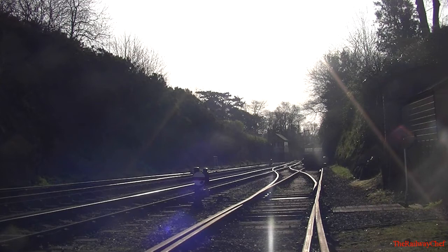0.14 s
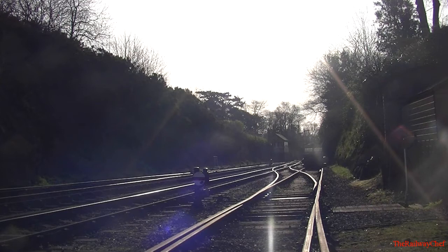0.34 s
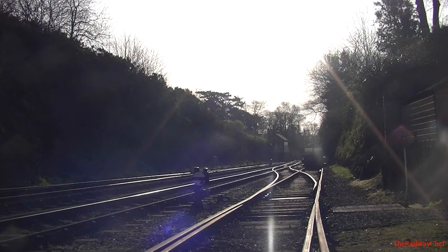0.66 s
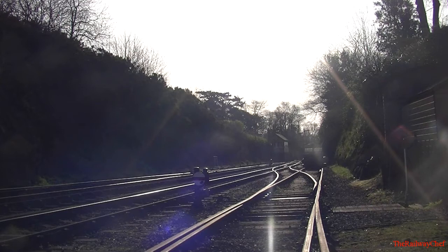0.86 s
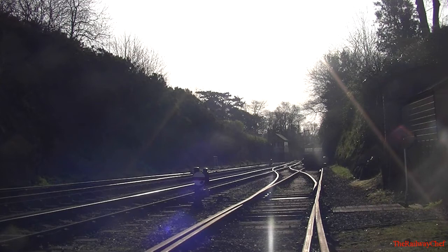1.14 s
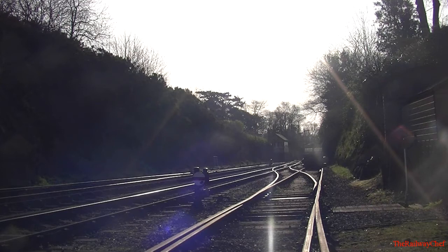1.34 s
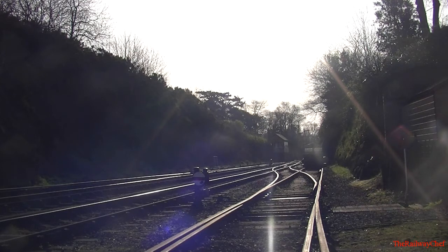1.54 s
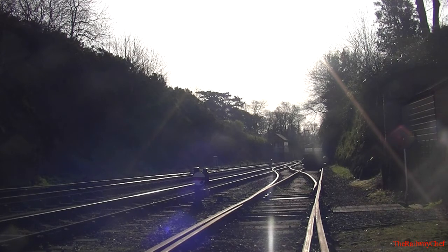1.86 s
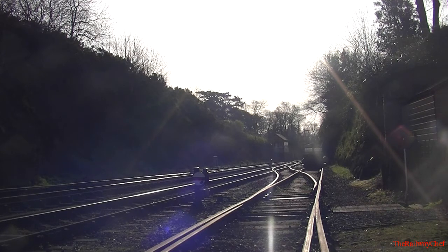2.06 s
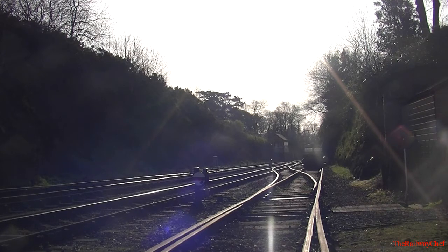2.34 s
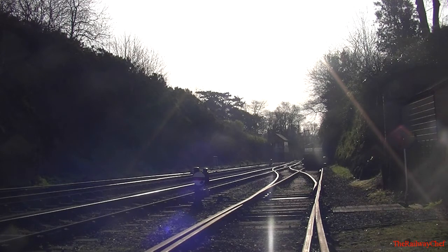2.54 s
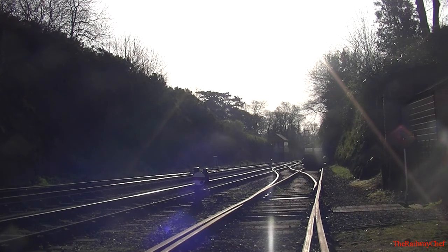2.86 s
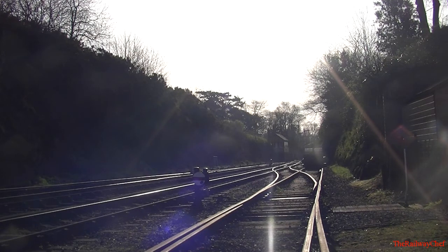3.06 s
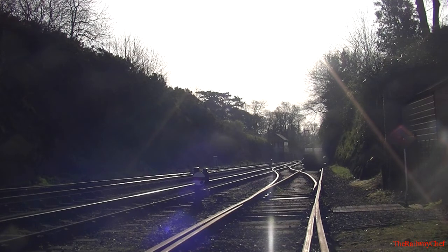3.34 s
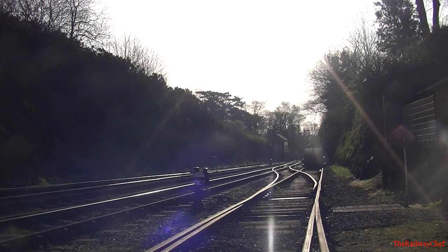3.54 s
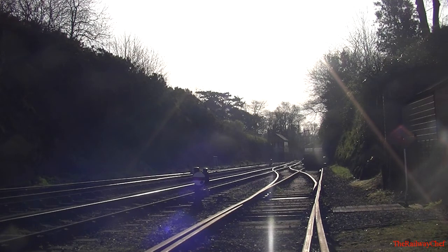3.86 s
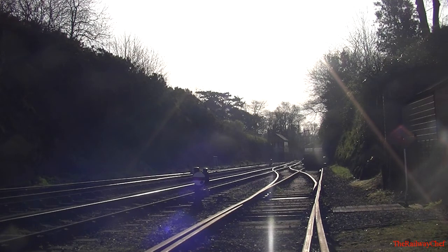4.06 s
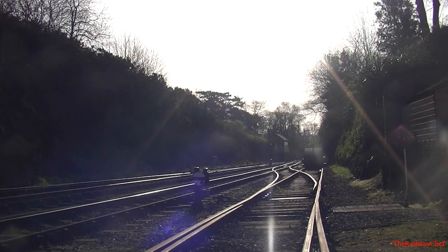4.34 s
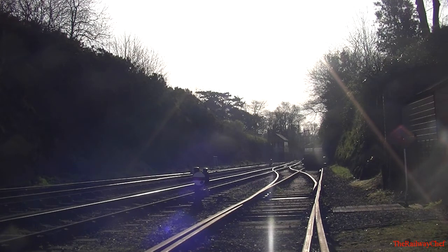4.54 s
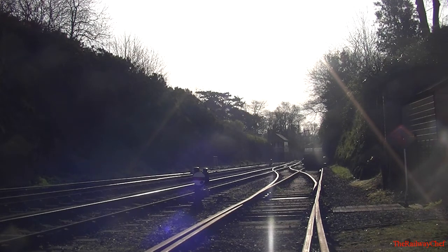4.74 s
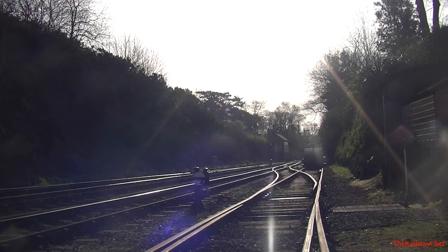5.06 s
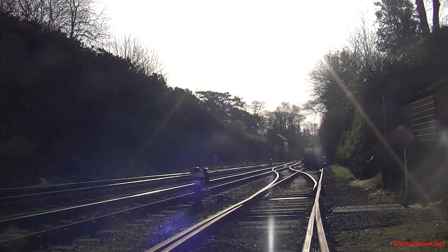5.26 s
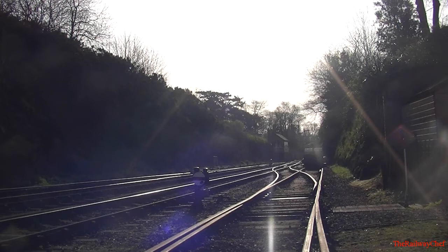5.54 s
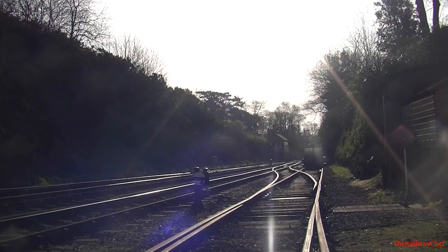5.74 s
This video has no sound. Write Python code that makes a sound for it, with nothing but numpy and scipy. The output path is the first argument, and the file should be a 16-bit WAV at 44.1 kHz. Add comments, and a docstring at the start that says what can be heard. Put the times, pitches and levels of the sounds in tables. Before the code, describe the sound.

Loud, bright, crackling steam hiss from a locomotive's open cocks, briefly choked several times, with slow soft chimney chuffs and a fuzzy rising tone.

```python
"""Open cylinder cocks of a steam locomotive, pulling away in a wooded cutting, blow bright crackling noise
that the valves cut off and release. Its chimney gives slow deep beats: filtered noise under level envelopes.
A slatted fence on the right adds a fuzzy climbing tone, noise bands at a pitch and its multiples.
A faint low rumble lies beneath. Two microphone ports receive it all partly in opposite phase."""
import sys
import numpy as np
from scipy import signal
from scipy.fft import rfft, irfft
from scipy.io import wavfile
from scipy.ndimage import uniform_filter1d

SR = 44100
rng = np.random.default_rng(int(sys.argv[2]) if len(sys.argv) > 2 else 0)


def generate_wav(sig):
    """Save sig (samples, or channels by samples) to the path in sys.argv[1] as 16-bit PCM at SR."""
    pcm = np.round(np.clip(np.atleast_2d(sig).T, -1, 1) * 32767).astype(np.int16)
    wavfile.write(sys.argv[1], SR, pcm)


N = 260190
FFT_SIZE, HOP = 2048, 512
HZ = np.fft.rfftfreq(FFT_SIZE, 1 / SR)[:, None]
FRAME_S = np.arange(N // HOP + 4) * HOP / SR

# spectral density of the low rumble: f/Hz, density/dB
RUMBLE_SPECTRUM = [(15, -45), (30, -20), (45, -7), (75, -12), (110, -3), (150, -6), (300, -5), (700, -5.5),
                   (2000, -16)]
# slow swell of the rumble: t/s, level/dB
RUMBLE_LEVEL = [(0, -65.5), (.6, -62.5), (1.4, -70.5), (2.1, -63), (2.65, -68), (3.3, -66.5), (4.3, -68),
                (4.8, -64), (5.9, -65)]
THUD_DB, RUMBLE_PAN_DB = -22, 3.5  # thud of each beat against its puff; left minus right

# coherence of the two ports: f/Hz, coherence
PORT_COHERENCE = [(30, .92), (90, .6), (250, .5), (700, .62), (1500, .56), (3000, .4), (6000, .38),
                  (10000, .39), (15000, .41)]
# phase between the ports: f/Hz, phase/rad
PORT_PHASE = [(60, 3.14), (700, 2.95), (2000, 2.6), (3400, 2.0), (5000, 2.45), (15000, 2.45)]
# extra left minus right: f/Hz, level/dB
PORT_LEAN = [(60, -0.5), (300, -1.5), (1200, -0.5), (3300, -6), (5500, -3.5), (9000, -1), (15000, -1.5)]
# arrival lag between the ports as the engine draws on: t/s, lag/us
PORT_LAG = [(0, 4), (3.3, 7), (4, 44), (5.9, 57)]
BAND_LIMIT_HZ = 15800

# fence echo: t/s, f/Hz, level against the hiss before port gains/dB,
# second tone minus first/dB, third tone minus first/dB, width of the first tone/Hz
FENCE_ECHO = [(0, 2980, 3.5, -14, -24, 380), (.15, 2930, 8.5, -19, -20, 400), (.3, 3040, 0, -15, -24, 380),
              (.5, 3050, 5, -13, -22, 550), (.8, 2980, 3, -15, -23, 300), (1.2, 3050, -0.5, -9, -22, 200),
              (1.5, 3040, 4, -15, -22, 200), (1.75, 3080, -3, -14.5, -16, 200),
              (1.86, 3045, 5, -12, -13, 240), (2.05, 3045, -0.5, -7.5, -11, 262),
              (2.3, 3100, -4.5, -5, -6.5, 300), (2.7, 3100, -0.5, -6, -15, 300),
              (3.1, 3220, -0.5, -15, -22, 400), (3.4, 3270, -3.5, -13, -18, 800),
              (3.7, 3270, 0, -7, -23, 450), (4.1, 3400, -0.5, -7, -20, 480), (4.5, 3680, -5, -8, -18, 320),
              (5.2, 3800, -2, -10, -20, 350), (5.5, 3990, -5, -12, -21, 350)]
FENCE_DELAY_S = 0.03  # the detour by the fence
FENCE_CUT_SHARE = 0.35  # a weak jet loses its tone faster than its hiss

# spectral density of a puff: f/Hz, density/dB
PUFF_SPECTRUM = [(20, -48), (60, -26), (120, -12.5), (250, -8.5), (400, -2), (700, 3.5), (1000, 6),
                 (1600, -22)]
# spectral density of the rush: f relative to its centre, density/dB
RUSH_SPECTRUM = [(.25, -37.5), (.5, -13), (.75, -3), (1.1, 0), (1.45, -4), (2.1, -9), (3.8, -35)]
# chimney resonances: f/Hz, width/Hz, boost/dB
STACK_RESONANCES = [(294, 47, 7.5), (374, 130, 3.5), (600, 37, 4), (813, 130, 1.5), (1145, 30, 2.5),
                    (1435, 33, 1.5), (1790, 45, 3)]
# exhaust beats: t/s, rise/s, hold/s, puff fade/(dB/s), relative puff level/dB, relative depth of the puff,
# relative rush level/dB, left minus right/dB, centre f of the rush/Hz, bark at the front/dB
EXHAUST_BEATS = [(0.055, 0.16, 0.016, 53, -39, 4, -27, 5.5, 1680, 0),
                 (1.782, .016, 0.037, 65, -39.5, 4.5, -25, 6.5, 1360, 3),
                 (2.61, .33, 0.075, 30, -40.5, 0, -32, 7.5, 1530, 2),
                 (3.41, 0.083, 0.1, 50, -39, 4, -27.5, 7.5, 1480, 0),
                 (4.996, 0.017, 0.083, 41, -40.5, 1, -29, 9.5, 1380, 4.5),
                 (5.754, 0.1, .1, 40, -47, 0, -30, 11, 1380, -0.5)]
# steady draught in the stack: t/s, relative rush level/dB, relative low level/dB
STACK_DRAUGHT = [(0, -29, -52), (.3, -30.5, -51), (.45, -29, -56), (.62, -35, -56), (.9, -35, -52.5),
                 (1.3, -33, -51.5), (2.2, -40.5, -53.5), (2.55, -35.5, -52.5), (3.35, -29.5, -46.5),
                 (3.85, -36.5, -49), (4.25, -33.5, -49), (4.45, -34, -47), (4.62, -33, -47),
                 (5.28, -36, -50), (5.4, -33, -52), (5.55, -36.5, -51), (5.7, -32.5, -47.5)]
DRAUGHT_DEPTH, DRAUGHT_PAN_DB = -2, 6.5
DRAUGHT_CUT_SHARE = 0.39  # share of the cocks' cutoff, in dB, felt by the draught
DRAUGHT_HZ, SINK_HZ_PER_DB = 1724, 29  # centre of the rush; it sinks as the cocks close
CLIMB_S = 0.094  # time constant of the climb back from a beat's own centre
RUSH_FADE_SHARE = 0.61  # the rush dies more slowly than the puff
BARK_S = 0.019

# spectral density of the steam hiss: f/Hz, density/dB
HISS_SPECTRUM = [(300, -29.5), (1200, -7), (2200, -2.5), (3000, 1), (4000, 0.5), (5500, -1), (7500, -3.5),
                 (10000, -6.5), (12500, -11.5), (15800, -22)]
# steam at the open cocks: t/s, level/dB, treble tilt/dB, left minus right/dB
COCK_STEAM = [(0, -29.5, -1.5, 7.5), (.27, -30, 0.5, 8.5), (.32, -28, -2, 8.5), (.47, -26.5, -0.5, 8),
              (.85, -31.5, 1.5, 8), (1.22, -29.5, 1, 10.5), (1.36, -29, 0, 7.5), (1.85, -30.5, 1, 12.5),
              (1.97, -27, 0, 10), (2.36, -29.5, 2, 10), (2.53, -31, 0.5, 9), (3.02, -30.5, -3.5, 11),
              (3.29, -27, 2, 8), (3.63, -29.5, 1, 9.5), (3.84, -29.5, 4, 10.5), (4.09, -31, 4, 10),
              (4.17, -28.5, 3, 9.5), (4.32, -32, 5, 11), (4.6, -29.5, 0, 9), (5.06, -31.5, 2, 11.5),
              (5.18, -26.5, 6.5, 8.5), (5.55, -28.5, 4.5, 7), (5.7, -28, 6, 6)]
# valve cutoffs: t at the start of closing/s, closing/s, shut/s, opening/s, level change on closing/dB
VALVE_CUTOFFS = [(1.336, 0.2, 0.252, 0.017, -10), (2.528, 0.15, .02, .16, -8), (3.03, 0.084, .01, 0.1, -4),
                 (4.624, .13, .21, 0.063, -8.5), (5.693, 0.12, .2, .05, -5)]
SHUT_SAG_DB_PER_S = 7.5  # trapped steam keeps draining while a cock is shut
DULL_PER_DB, SHUT_PAN_PER_DB = 0.46, 0.26  # a falling jet dulls and moves towards the middle


def amp(db):
    return 10 ** (np.asarray(db) / 20)


def evened(x):
    """Normalisation to unit rms."""
    return x / np.sqrt(np.mean(x ** 2) + 1e-20)


def over_hz(points, hz):
    """Interpolation on a logarithmic frequency axis."""
    f, value = np.transpose(points)
    return np.interp(np.log(hz + 1), np.log(f + 1), value)


def over_time(rows, t):
    """Linear interpolation of every column in time."""
    s, *columns = np.transpose(rows)
    return [np.interp(t, s, column) for column in columns]


def power_sum(levels_db):
    """Incoherent superposition: powers add."""
    return 10 * np.log10(np.sum(amp(levels_db) ** 2, axis=0) + 1e-20)


def blend(levels_db, values):
    """Power weighting: the mean of values, each weighted by the power that carries it."""
    power = amp(levels_db) ** 2
    return np.sum(power * np.array(values)[:, None], axis=0) / power.sum(0)


def flutter(top_hz):
    """Random modulation: low-passed noise of rms 1, a wobble common to a jet's whole spectrum."""
    spectrum = rfft(rng.standard_normal(N))
    low_pass = 1 / (1 + (np.fft.rfftfreq(N, 1 / SR) / top_hz) ** 2)
    return evened(irfft(spectrum * low_pass, N))


def banded(pair, lo_hz, hi_hz):
    """Parseval's theorem: scales a pair so that its middle has rms 1 inside a band."""
    spectrum, hz = rfft(pair.mean(0)), np.fft.rfftfreq(N, 1 / SR)
    in_band = spectrum[(hz > lo_hz) & (hz < hi_hz)]
    return pair / np.sqrt(2 * np.sum(abs(in_band) ** 2)) * N


def resynthesis(spectra):
    """Overlap-add: short-time spectra become signals."""
    return signal.istft(spectra, nperseg=FFT_SIZE, noverlap=FFT_SIZE - HOP)[1][..., :N]


def placed(pair, level_db, pan_db):
    """Intensity stereophony: a level difference shared equally between the ports."""
    return pair * amp(level_db + np.array([pan_db, -pan_db]) / 2)


def crackle(share=.5, density=.08):
    """Shock noise of a fast jet: one-sided clicks hold a share of the power, white noise the rest."""
    shape = (2, N + FFT_SIZE)
    clicks = -1. * (rng.random(shape) < density) * rng.uniform(.5, 1.5, shape)
    shocks = np.sqrt(share) * evened(clicks - clicks.mean())
    mix = shocks + np.sqrt(1 - share) * rng.standard_normal(shape)
    spectra = signal.stft(mix, nperseg=FFT_SIZE, noverlap=FFT_SIZE - HOP)[2]
    return spectra[..., :len(FRAME_S)]


def turbulence(colour_db, patchy_db, ripple_db):
    """Partial coherence: drifting patchy jet noise at two ports; echoes leave narrow lasting ripples."""
    patches, *ripples = rng.standard_normal((len(FRAME_S), len(HZ), 3)).T
    patches = evened(uniform_filter1d(uniform_filter1d(patches, size=24, axis=0), size=7, axis=1))
    # one ripple pattern per port, narrow in frequency and long in time
    ripples = evened(uniform_filter1d(uniform_filter1d(ripples, size=2, axis=1), size=30, axis=2))
    lag_s = over_time(PORT_LAG, FRAME_S)[0] * 1e-6
    phase = over_hz(PORT_PHASE, HZ) - 2 * np.pi * HZ * lag_s
    shared = np.clip(over_hz(PORT_COHERENCE, HZ), 0, 1) * np.exp(1j * phase)
    left, other = crackle()
    right = shared * left + np.sqrt(abs(1 - abs(shared) ** 2)) * other
    lean = amp(over_hz(PORT_LEAN, HZ) / 2)
    colour = amp(colour_db + patchy_db * patches + ripple_db * ripples)
    return resynthesis(np.array([left * lean, right / lean]) * colour)


def cutoff_db(t):
    """Throttling: how far the valves hold the steam down, with a sag while shut."""
    total = 0
    for start, closing, shut, opening, drop_db in VALVE_CUTOFFS:
        corners = np.cumsum([start, closing, shut, opening])
        total = total + np.interp(t, corners, [0, drop_db, drop_db - SHUT_SAG_DB_PER_S * shut, 0])
    return total


def hiss_db(t):
    """Gain in series: steam level and valve cutoff add in decibels."""
    return over_time(COCK_STEAM, t)[0] + cutoff_db(t)


def beat_db(t, start, rise, hold, fade, bark_db):
    """Pulse envelope: linear swell raised by a brief bark, hold at 0 dB, exponential decay."""
    after = np.maximum(t - start - rise, 0)
    swell_db = 20 * np.log10(np.clip((t - start) / rise, 1e-4, 1))
    return swell_db + bark_db * np.exp(-(after / BARK_S) ** 2) - fade * np.maximum(after - hold, 0)


def exhaust(t):
    """Superposed exhaust flow: puff dB, relative depth, rush dB, rush centre Hz, left minus right dB."""
    rush_db, low_db = over_time(STACK_DRAUGHT, t)
    puffs, depths = [low_db], [DRAUGHT_DEPTH]
    rushes, pans = [rush_db + DRAUGHT_CUT_SHARE * cutoff_db(t)], [DRAUGHT_PAN_DB]
    centre_hz = DRAUGHT_HZ + SINK_HZ_PER_DB * cutoff_db(t)
    for start, rise, hold, fade, puff_db, depth, blast_db, pan_db, hz, bark_db in EXHAUST_BEATS:
        puffs.append(puff_db + beat_db(t, start, rise, hold, fade, bark_db))
        rushes.append(blast_db + beat_db(t, start, rise, hold, RUSH_FADE_SHARE * fade, bark_db))
        depths.append(depth)
        pans.append(pan_db)
        # the centre moves to the beat's own frequency, then climbs back
        after_hold = np.maximum(t - start - rise - hold, 0)
        fresh = np.clip((t - start) / rise, 0, 1) * np.exp(-after_hold / CLIMB_S)
        centre_hz = centre_hz + fresh * (hz - centre_hz)
    return power_sum(puffs), blend(puffs, depths), power_sum(rushes), centre_hz, blend(rushes, pans)


def rumble():
    """Low-frequency radiation: faint noise, nearly opposite in the ports, that swells with each beat."""
    low = banded(turbulence(over_hz(RUMBLE_SPECTRUM, HZ), patchy_db=.6, ripple_db=1.6), 35, 160)
    t = np.arange(N) / SR
    levels = over_time(RUMBLE_LEVEL, t)
    for start, rise, hold, fade, puff_db, *_ in EXHAUST_BEATS:
        levels.append(THUD_DB + puff_db + beat_db(t, start, rise, hold, fade, bark_db=0))
    return placed(low, power_sum(levels), np.full(N, RUMBLE_PAN_DB))


def fence():
    """Periodic reflection: even slats return a band and its multiples, climbing as the engine's angle changes."""
    hz, level_db, second_db, third_db, width = over_time(FENCE_ECHO, FRAME_S)
    tones = 0
    for multiple, tone_db in enumerate([0, second_db, third_db], start=1):
        offset = 2 * (HZ - multiple * hz) / (width * np.sqrt(multiple))
        tones = tones + amp(tone_db) / (1 + offset ** 4)
    real, imaginary, ripples = rng.standard_normal((len(FRAME_S), len(HZ), 2, 3)).T
    ripples = evened(uniform_filter1d(uniform_filter1d(ripples, size=3, axis=1), size=20, axis=2))
    noise = real + 1j * imaginary
    other, right = noise * tones / np.sqrt(width) * amp(2.0 * ripples)
    left = 0.52 * right * np.exp(-.6j) + 0.65 * other  # the left port shares part of it, turned in phase
    left *= amp(5.4 * np.log2(HZ / hz + .1))  # the higher tones spread further to the left
    echo = evened(resynthesis(np.array([left, right])))
    t = np.arange(N) / SR
    late = t - FENCE_DELAY_S
    late_db = hiss_db(late) + FENCE_CUT_SHARE * cutoff_db(late)
    echo_db = late_db + np.interp(t, FRAME_S, level_db) + 1.0 * flutter(top_hz=10)
    return echo * amp(echo_db + np.array([[-9.], [-1.5]]))  # left and right gains in dB


def chimney():
    """Resonant filtering: the stack colours low exhaust puffs and the rush of the blast nozzle above them."""
    low_db, _, rush_db, _, pan_db = exhaust(np.arange(N) / SR)
    _, depth, _, centre_hz, _ = exhaust(FRAME_S)
    stack_db = sum(db / (1 + (2 * (HZ - hz) / width) ** 2) for hz, width, db in STACK_RESONANCES)
    deep_tilt = np.clip(np.log(550 / (HZ + 1)), -.5, 1)
    puff_colour_db = over_hz(PUFF_SPECTRUM, HZ) + 1.4 * depth * deep_tilt
    share, shape_db = np.transpose(RUSH_SPECTRUM)
    rush_colour_db = np.interp(np.log(HZ / centre_hz + 1e-9), np.log(share), shape_db)
    puff = banded(turbulence(puff_colour_db + stack_db, patchy_db=0.46, ripple_db=4.0), 200, 860)
    rush = banded(turbulence(rush_colour_db + stack_db, patchy_db=1.5, ripple_db=3.5), 980, 2330)
    eddies_db = 0.3 * flutter(top_hz=9.4) + 0.29 * flutter(top_hz=150)
    return placed(puff * amp(low_db - 2.5) + rush * amp(rush_db - 3.0), eddies_db, pan_db)


def cocks():
    """Jet noise: a wide wet-steam hiss dulls as pressure drops and flutters as water passes."""
    t = np.arange(N) / SR
    pan_db = over_time(COCK_STEAM, t)[2] + SHUT_PAN_PER_DB * cutoff_db(t)
    bright_db = over_time(COCK_STEAM, FRAME_S)[1] + DULL_PER_DB * cutoff_db(FRAME_S)
    tilt = np.clip(np.log(HZ / 6500 + 1e-9) / 1.05, -.3, 1.5)  # pivots in mid treble
    colour_db = over_hz(HISS_SPECTRUM, HZ) + tilt * bright_db
    hiss = banded(turbulence(colour_db, patchy_db=0.48, ripple_db=1.5), 4100, 9330)
    flutter_db = 0.5 * flutter(top_hz=24) + 0.17 * flutter(top_hz=200)
    return placed(hiss, hiss_db(t) + flutter_db, pan_db)


def scene():
    """Linear superposition of the four sources."""
    return rumble() + fence() + chimney() + cocks()


def record(dry):
    """Band limitation: the recorder acts as a linear-phase low-pass filter."""
    low_pass = signal.firwin(1023, BAND_LIMIT_HZ, window=("kaiser", 10), fs=SR)
    return signal.oaconvolve(dry, low_pass[None], "same")


dry = scene()
out = record(dry)
generate_wav(out)
```